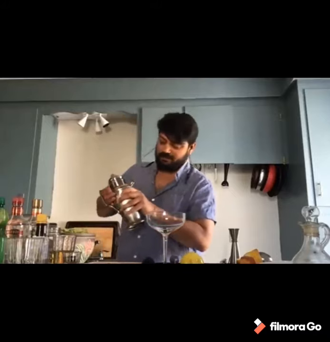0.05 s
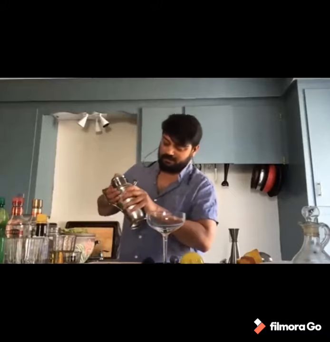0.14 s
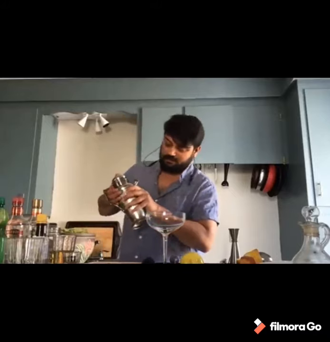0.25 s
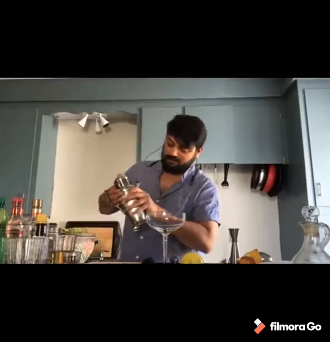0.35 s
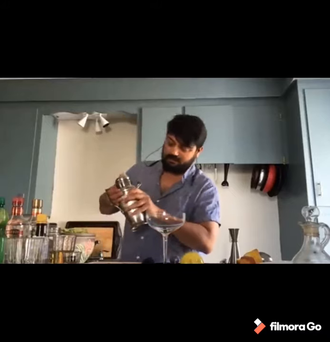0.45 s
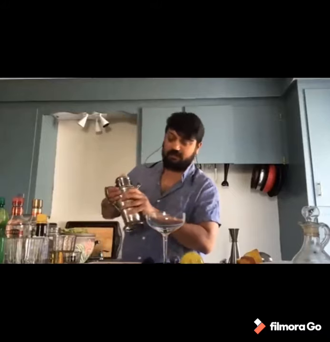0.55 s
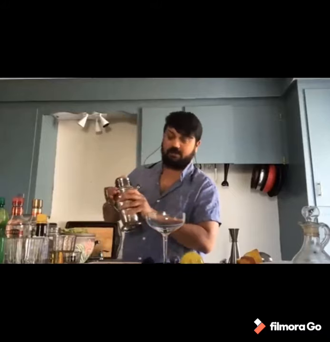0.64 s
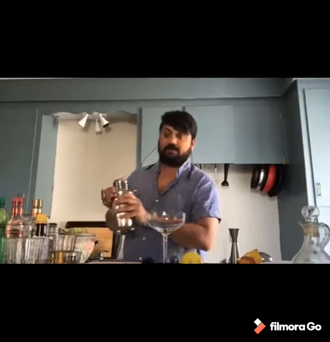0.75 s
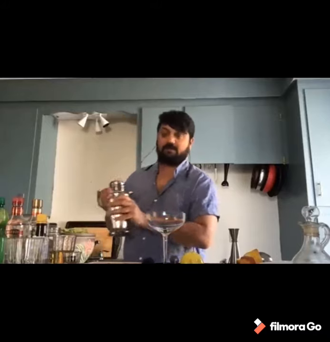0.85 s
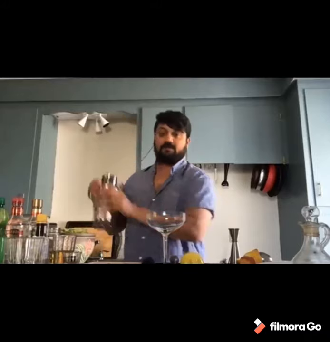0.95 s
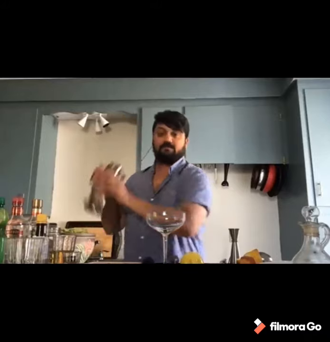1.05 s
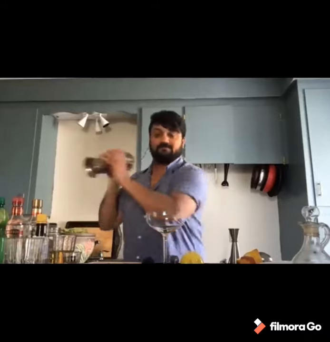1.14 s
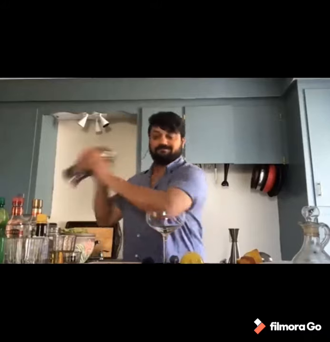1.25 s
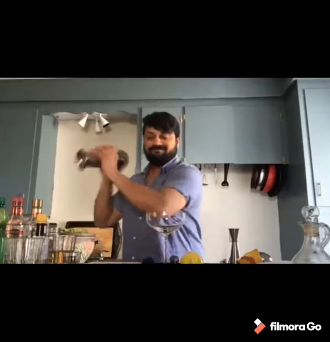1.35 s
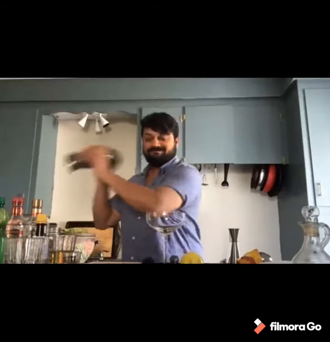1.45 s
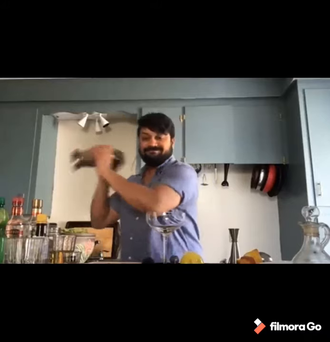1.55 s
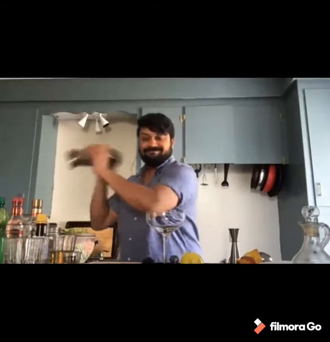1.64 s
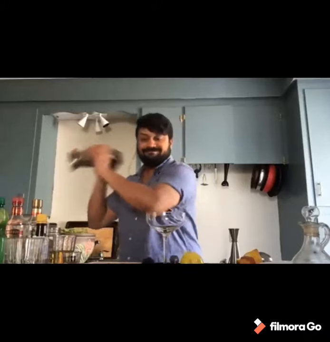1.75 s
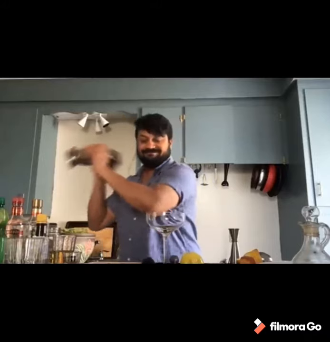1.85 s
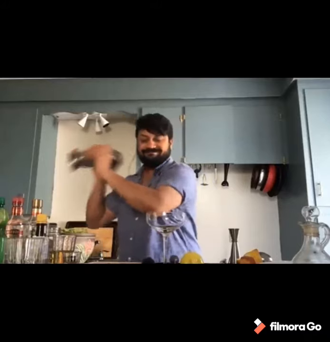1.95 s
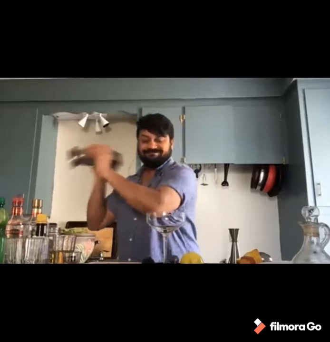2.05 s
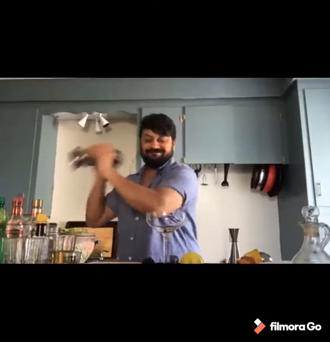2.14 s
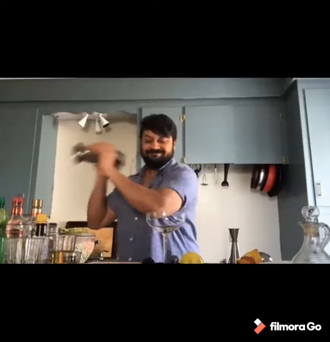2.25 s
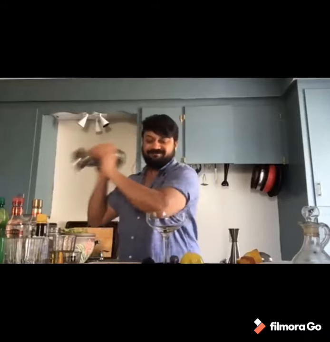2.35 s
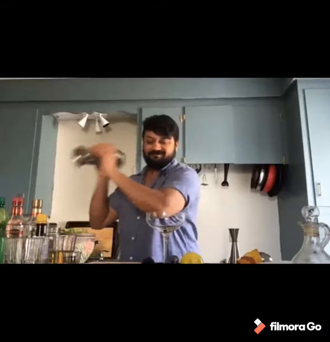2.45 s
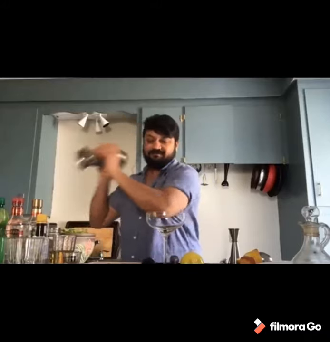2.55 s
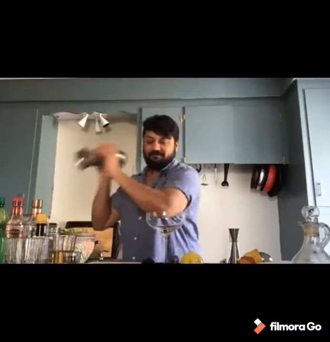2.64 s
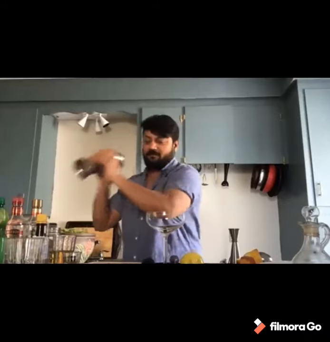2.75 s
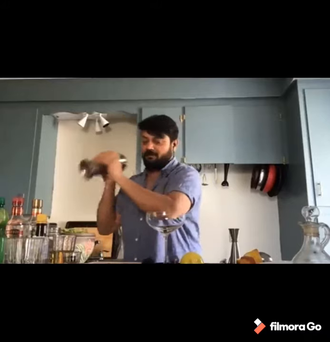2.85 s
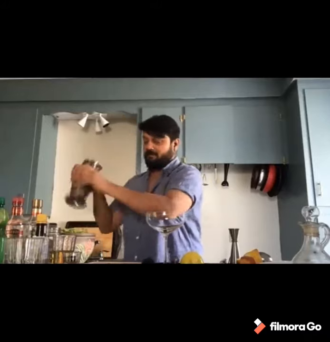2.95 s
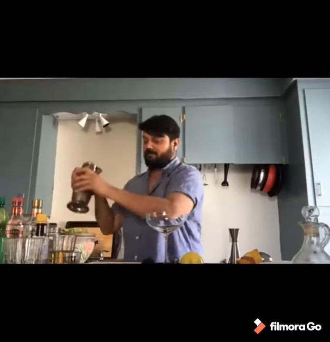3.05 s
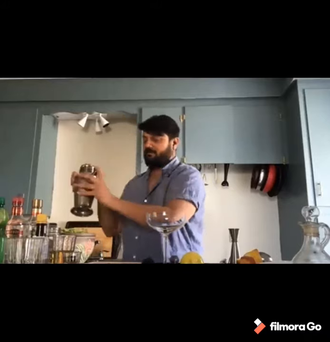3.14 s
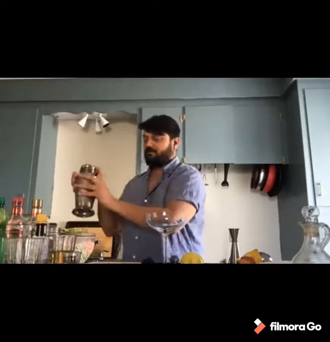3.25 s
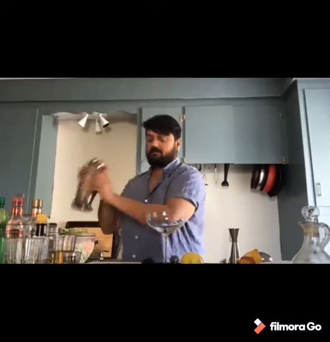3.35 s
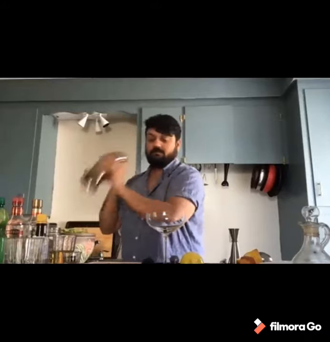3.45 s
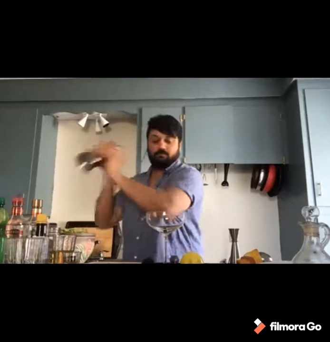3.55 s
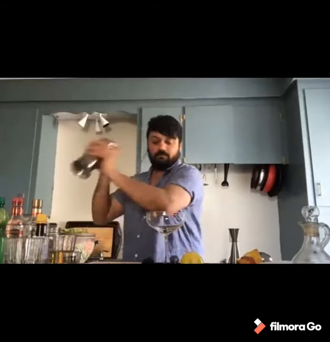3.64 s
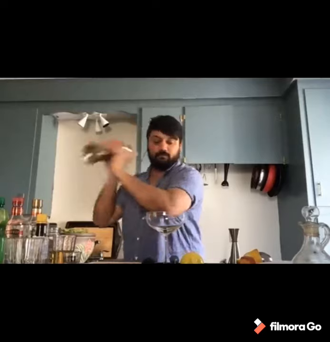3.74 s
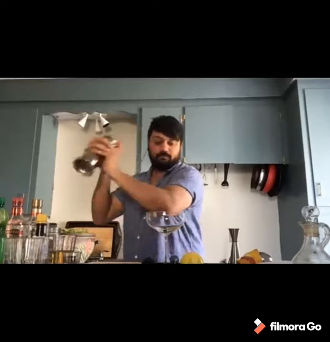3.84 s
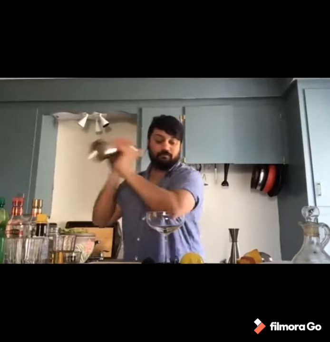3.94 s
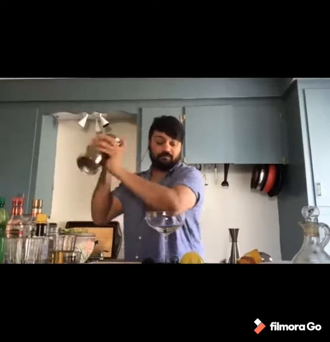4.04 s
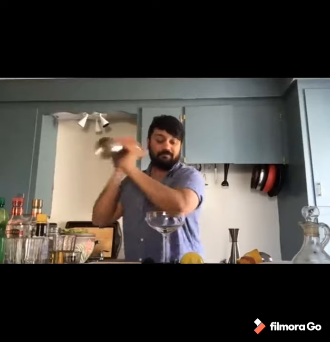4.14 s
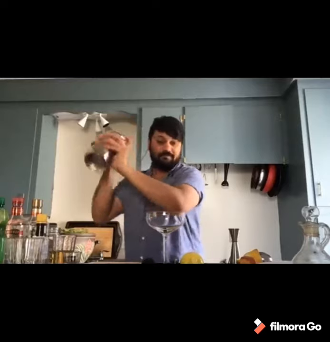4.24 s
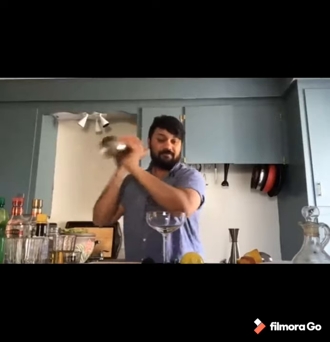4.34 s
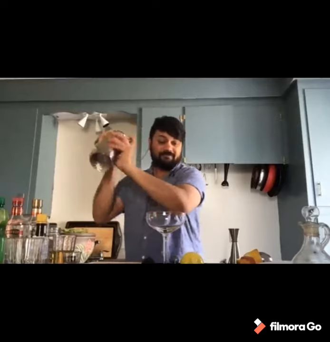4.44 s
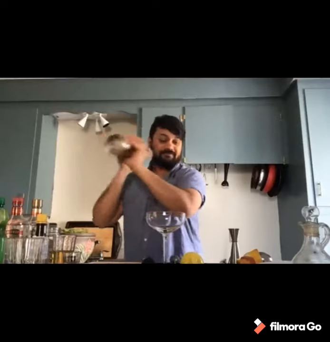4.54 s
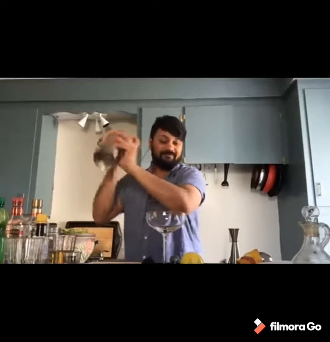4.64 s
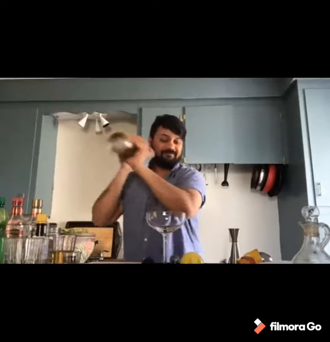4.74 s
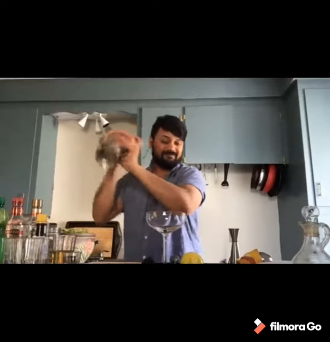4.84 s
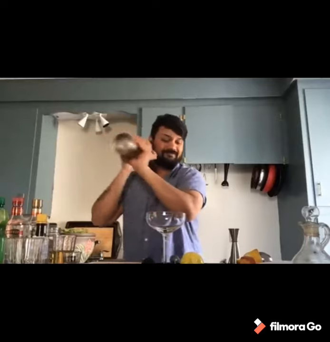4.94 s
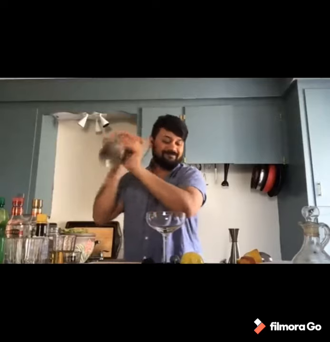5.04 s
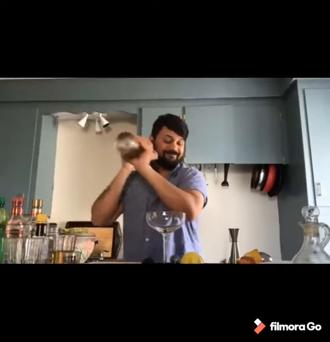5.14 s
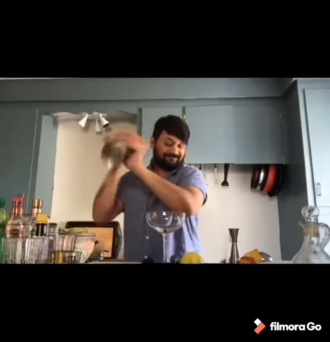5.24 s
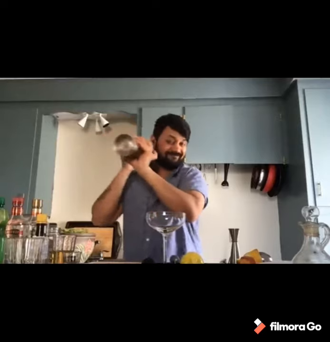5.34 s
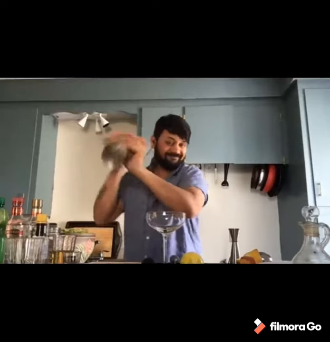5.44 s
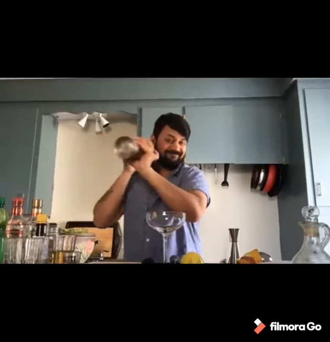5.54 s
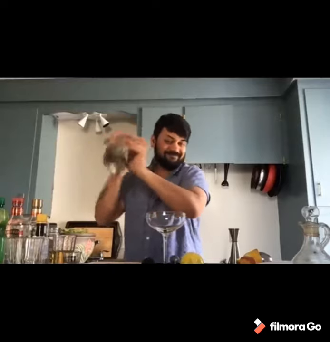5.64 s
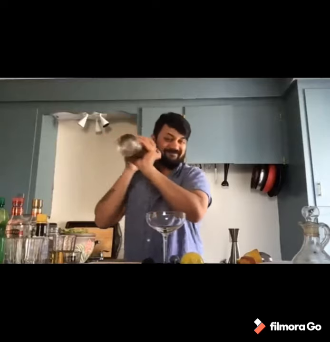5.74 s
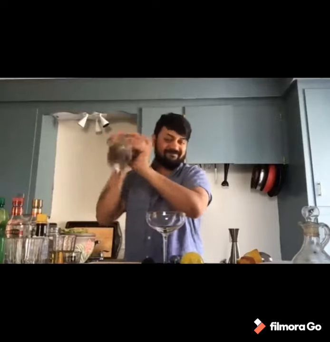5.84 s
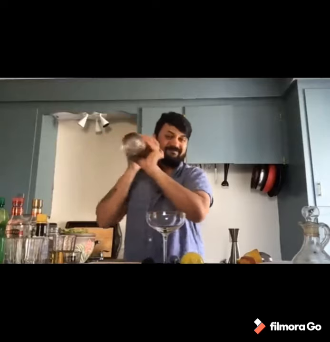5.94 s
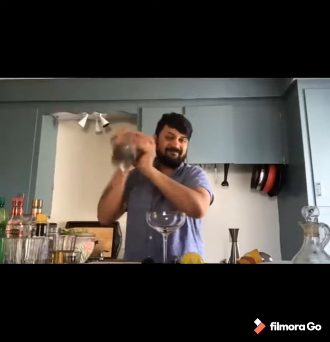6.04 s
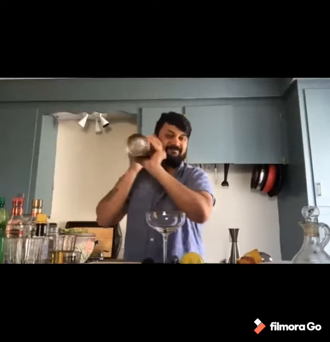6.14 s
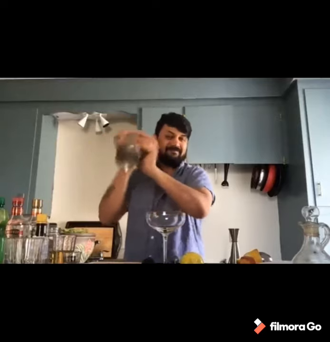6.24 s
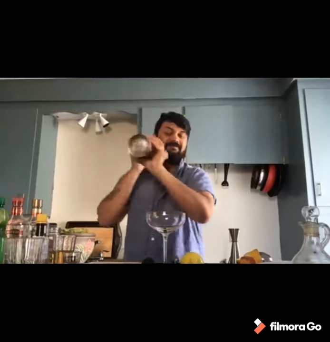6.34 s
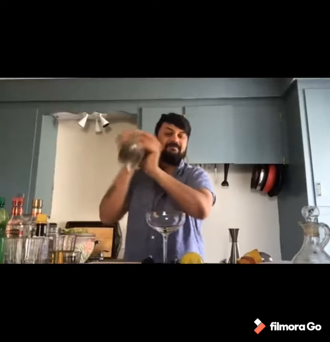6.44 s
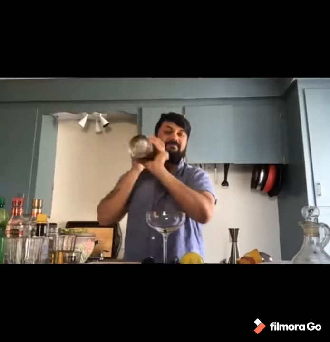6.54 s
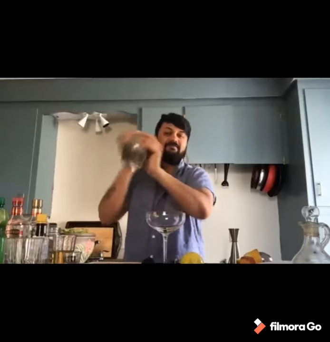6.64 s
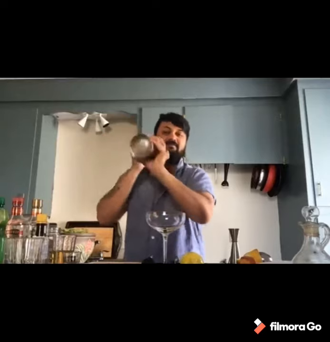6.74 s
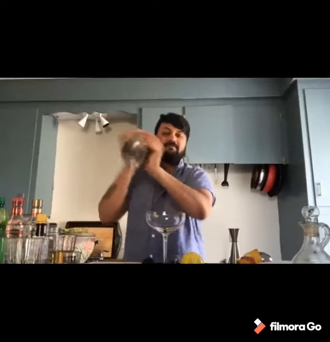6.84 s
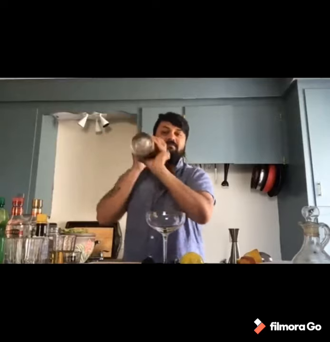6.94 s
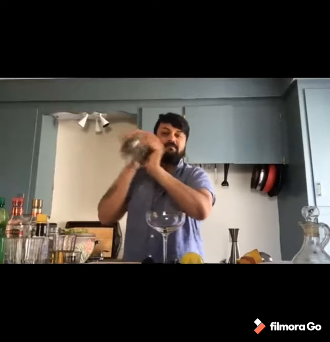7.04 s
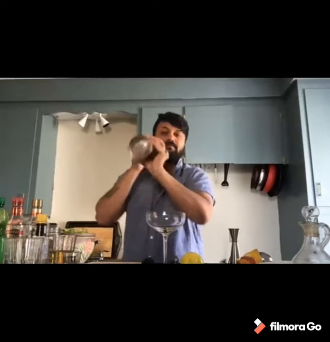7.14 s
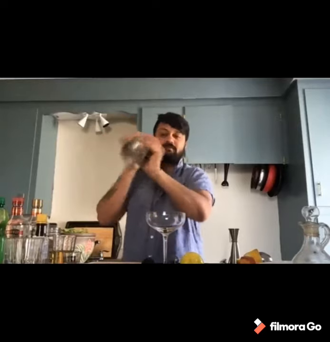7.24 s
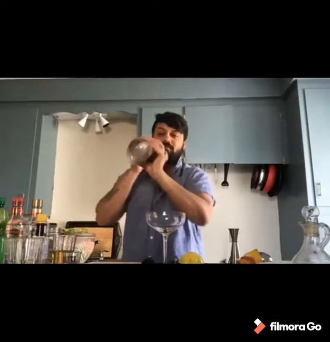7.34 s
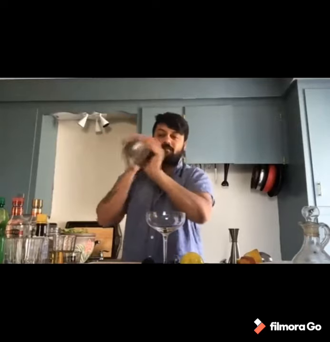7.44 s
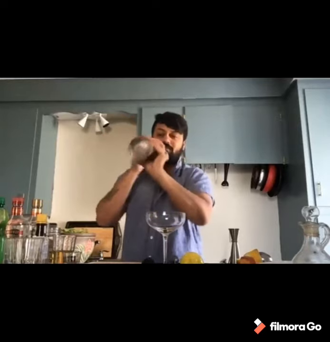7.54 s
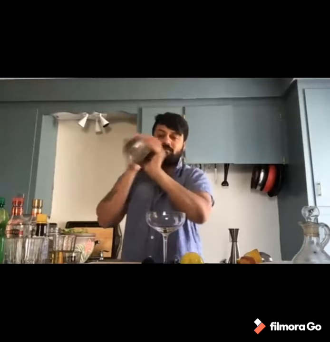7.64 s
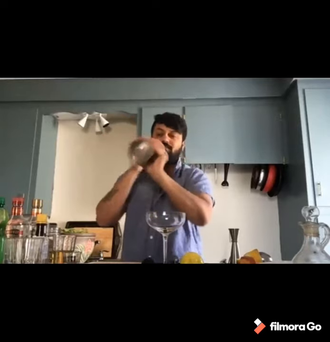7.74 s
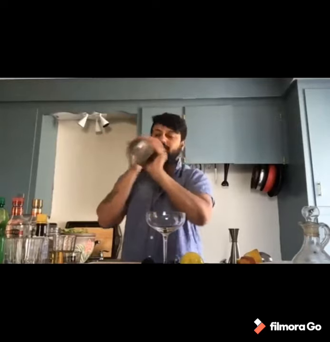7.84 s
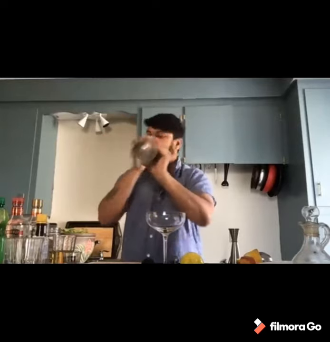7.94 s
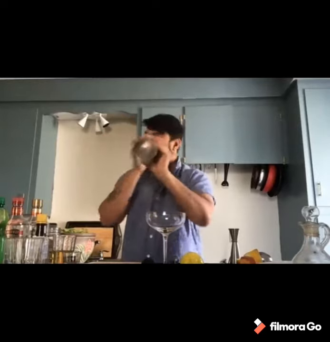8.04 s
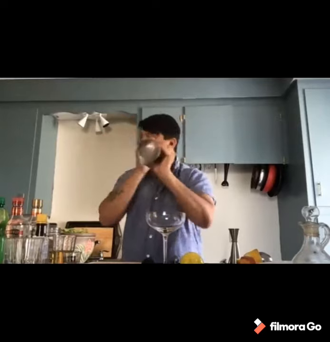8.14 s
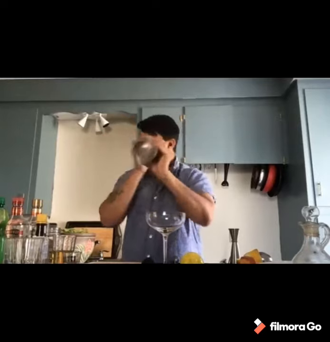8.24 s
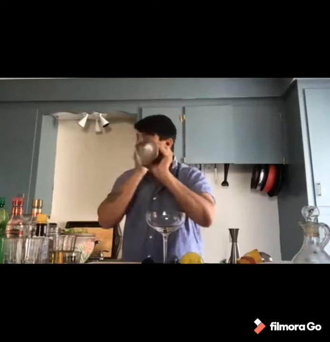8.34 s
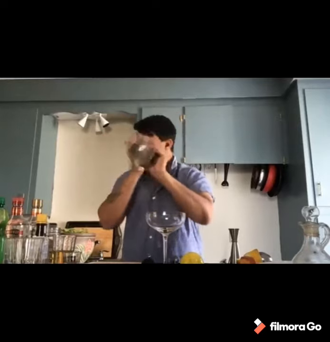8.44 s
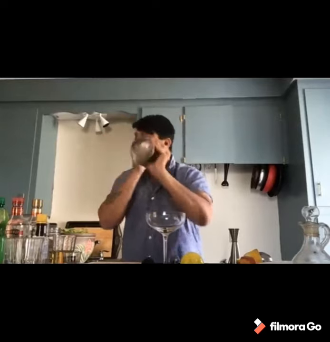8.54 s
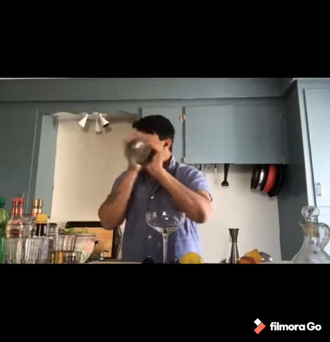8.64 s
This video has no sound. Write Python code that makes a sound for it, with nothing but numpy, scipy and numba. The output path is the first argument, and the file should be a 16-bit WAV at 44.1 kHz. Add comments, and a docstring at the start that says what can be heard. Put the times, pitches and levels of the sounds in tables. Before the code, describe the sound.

From 0 to 1.15 s there is near silence with faint wet clicks and tiny pings as ice shifts in a hand-held steel shaker. At about 1.2 s hard shaking bursts in: loud, short, damped metallic clacks, around twenty to thirty knocks and rebounds a second, centred in the middle pitches, with chips clattering and liquid sloshing between. It runs to 3.1 s, then nearly stops, with a small soft knock near 3.25 s and faint clicks. At 3.56 s a second equally dense bout begins, slightly lower in colour, with a momentary dropout near 4.64 s, ending about 5.9 s. Afterwards the rattle is clearly softer, rounder and sparser, with individual knocks and short pings of varied pitch, one stronger near 7.05 s, continuing to the end around 8.7 s. Short hard-kitchen echoes; midrange microphone, little bass or treble, tails clipped by noise suppression.

```python
"""Ice cubes are thrown to and fro in a hand-held steel shaker: a few handling knocks, two bouts of hard shaking
with a pause between, then a softer rattle. Hands and liquid damp the shell's modes, so each knock is a short
clack; noise washed through the same modes is the slosh, and swelling sines are the pings of single cubes.
The place is a hard kitchen with short diffuse echoes; a small microphone with a noise suppressor cuts the
quiet tails."""
import sys
import numpy as np
from scipy import signal
from scipy.fft import rfft, irfft
from scipy.io import wavfile
from scipy.ndimage import uniform_filter1d, minimum_filter1d
from numba import njit

SR = 44100
rng = np.random.default_rng(int(sys.argv[2]) if len(sys.argv) > 2 else 0)


def to_wav(s):
    """Save 16-bit WAV."""
    ch = np.atleast_2d(s).T  # columns
    pcm = np.round(np.clip(ch, -1, 1) * 32767)  # PCM
    wavfile.write(sys.argv[1], SR, pcm.astype(np.int16))


N = 384111


def from_db(db):
    """Decibels to gain."""
    return 10 ** (np.asarray(db) / 20)


def train(at, sizes):
    """Clicks of the given sizes at the given samples."""
    return np.bincount(np.clip(at, 0, N - 1), sizes, N)


def decay(x, t60):
    """Each click becomes a falling exponential."""
    return signal.lfilter([1], [1, -from_db(-60 / (t60 * SR))], x + 1e-18)


def swell(clicks, t60, rise_s):
    """Each click becomes a quick rise and an exponential fall."""
    return decay(clicks, t60) - decay(clicks, min(rise_s, t60 / 2))


def filtered(x, order, edge_hz, kind):
    """Butterworth filter."""
    return signal.sosfilt(signal.butter(order, edge_hz, kind, fs=SR, output="sos"), x)


@njit
def spin(clicks, turn):
    """A decaying rotor, turned by a new step every 64 samples."""
    out, z = np.empty(len(clicks)), 0j
    for i in range(len(clicks)):
        z = z * turn[i >> 6] + clicks[i]
        out[i] = z.imag
    return out


def ring(clicks, hz, t60):
    """A unit click sets a sine of height 1 ringing; hz holds its pitch every 64 samples."""
    return spin(clicks + 1e-18, from_db(-60 / (t60 * SR)) * np.exp(2j * np.pi * hz / SR))


KITCHEN_T60_S, KITCHEN_DB = 0.19, -11


def dying_noise(t60):
    """White noise that falls by 60 dB in t60, energy 1."""
    count = int(t60 * SR)
    tail = rng.standard_normal(SR)[:count] * from_db(-60 * np.arange(count) / count)
    return tail / np.sqrt(np.sum(tail ** 2))


def kitchen(x):
    """Diffuse echoes from cupboards and tiles, starting 4 ms after the direct sound."""
    echoes = np.r_[np.zeros(int(.004 * SR)), dying_noise(KITCHEN_T60_S)]
    return signal.fftconvolve(x, echoes)[:N]


# the bouts of hard shaking; all other times count as gentle: start_s, end_s
HARD_SHAKING = [(1.19, 3.1), (3.56, 5.9)]


def shaken_hard(s):
    """True inside the bouts of hard shaking."""
    return sum((s > a) & (s < b) for a, b in HARD_SHAKING) > 0


# grip and liquid bend the shell's modes: depth (share of pitch), changes per s
WANDER, WANDER_PER_S = 0.034, 23
STILL_SHARE = 0.3   # share of that depth before the shaking starts


def wander():
    """A pitch factor that strays at random as grip and liquid load the steel, one value every 64 samples."""
    s = np.arange(N // 64 + 1) * 64 / SR
    depth = WANDER * np.where(s < HARD_SHAKING[0][0], STILL_SHARE, 1)
    return 1 + depth * np.interp(s * WANDER_PER_S, np.arange(1000), rng.standard_normal(1000))


# steel shell's modes, before wander and the damping of each kind of contact: pitch_hz, level_db, t60_s
SHELL = [(262, 0, 0.039), (397, -6.5, 0.037), (480, 0, 0.032), (594, 1, 0.019), (752, 3.5, 0.018),
         (929, -9.5, 0.078), (1045, 2.5, 0.041), (1156, 1, 0.033), (1331, -2, 0.061), (1494, -4, 0.051),
         (1640, -2.5, 0.074), (1845, 2, 0.025), (2147, -4.5, 0.035), (2406, 7, 0.01), (2758, 1.5, 0.019),
         (2970, 4.5, 0.011), (3370, 7, 0.016), (3684, 7.5, 0.012), (4074, 5, 0.016), (4350, -4, 0.081),
         (5840, 2, 0.084)]
# the dry crack at first contact falls in one of these bands: low_hz, high_hz
CRACK_HZ = [(500, 2140), (800, 3600), (1500, 6000)]
TICK_DB, THUD_DB = 20, 16.5   # contact noise above and below the modes
MOST_CYCLES = 90   # no mode takes more cycles than this to fall by 60 dB


def shell(at, level_db, spot_hz, treble_db, bass_db, focus_db, scatter_db, contact_s, rise_s, clack_db, ring_share,
          treble_hz, crack_db):
    """A blow sets each mode ringing, most those near its spot; the ring swells over the contact, and the
    chatter of the contact adds a noisy clack around each mode; first contact is a dry crack."""
    chance = rng.standard_normal((len(at), len(SHELL), 2))
    chatter = rng.standard_normal((2, N)) / np.sqrt(contact_s * SR / 14)
    out = np.zeros(N)
    for k, (hz, mode_db, t60) in enumerate(SHELL):
        away = np.minimum(np.abs(np.log2(hz / spot_hz)) / 0.27, 1)   # 0 at the spot, 1 from 0.27 octave off
        treble_tilt_db = treble_db * np.clip(np.log2(hz / treble_hz) * 2, 0, 1)
        bass_tilt_db = bass_db * np.clip(np.log2(1000 / hz) * 2, 0, 1)
        off_spot_db = treble_tilt_db + bass_tilt_db - focus_db + scatter_db * chance[:, k, 0]
        strength = from_db(level_db + mode_db + away * off_spot_db)
        blows = train(at, strength * np.sign(chance[:, k, 1]))
        longest = min(t60 * ring_share, MOST_CYCLES / hz)       # wet hands damp the high modes first
        bent_hz = hz * wander()
        out += ring(blows, bent_hz, longest) - ring(blows, bent_hz, min(rise_s, longest / 2))
        clack = swell(train(at, strength), contact_s, rise_s) * chatter[k % 2]
        out += from_db(clack_db) * filtered(clack, 2, [hz / 1.07, hz * 1.07], "band")

    tick_size = from_db(level_db + 0.71 * treble_db + 2.3 * chance[:, 0, 1])
    tick = swell(train(at, tick_size), 2.34 * contact_s, 0.071 * rise_s) * chatter[0]
    thud = swell(train(at, from_db(level_db + bass_db)), contact_s, rise_s) * chatter[1]

    crack_level_db = level_db + crack_db + 0.4 * np.minimum(treble_db, 0) + 4.04 * chance[:, 1, 0]
    crack = from_db(crack_level_db) * np.sign(chance[:, 1, 1])
    colour = np.argmax(chance[:, :len(CRACK_HZ), 1], axis=1)   # each blow draws one band
    for k, edges_hz in enumerate(CRACK_HZ):
        out += filtered(train(at, crack * (colour == k)) + 1e-18, 2, edges_hz, "band")
    out += from_db(TICK_DB) * filtered(tick, 2, 5800, "high")
    return out + from_db(THUD_DB) * filtered(thud, 1, 150, "low")


# liquid against the stirring of the ice, in hard and gentle shaking (dB); surge time (s);
# how long it rings the shell (share of t60); where the wash's treble ends (Hz)
SLOSH_DB, SURGE_S, SLOSH_RING, SLOSH_TOP_HZ = (-40, -41), 0.022, 0.37, 4470
SLOSH_BASS_HZ, SPRAY_DB = 640, 18   # the wash has little below this; fine spray hisses on top
RUMBLE_DB, RUMBLE_HZ = (39, 34.5), 244   # the liquid's weight rumbles below the modes, in hard and gentle shaking
LUMP_DB, LUMPS_PER_S = 5, 14   # the rumble comes in lumps: spread and rate


def slosh(flow):
    """Liquid surges ahead of the ice, drains after it and washes softly through the shell's modes."""
    t = np.arange(N) / SR
    width = int(SURGE_S * SR)
    surge = uniform_filter1d(uniform_filter1d(flow, size=width), size=width)
    wash = surge * rng.standard_normal(N)
    lumps = from_db(LUMP_DB * np.interp(t * LUMPS_PER_S, np.arange(1000), rng.standard_normal(1000)))
    rumble = filtered(wash * lumps, 2, RUMBLE_HZ, "low")
    spray = filtered(wash, 4, 5000, "high")
    wash = filtered(wash, 2, [SLOSH_BASS_HZ, SLOSH_TOP_HZ], "band")
    rings = np.zeros(N)
    for k, (hz, db, t60) in enumerate(SHELL):
        rings += (-1) ** k * from_db(db) * ring(wash, hz * wander(), t60 * SLOSH_RING)
    return rings + from_db(SPRAY_DB) * spray + from_db(np.where(shaken_hard(t), *RUMBLE_DB)) * rumble


# loose chips tumbling after a knock (dB against it, in hard and in gentle shaking) and how often (per s)
TUMBLE_DB, TUMBLE_PER_S = (-14, -14), (450.0, 330)
TUMBLE_FOCUS_DB = (16, 21)   # how much a chip favours its own spot, in hard and in gentle shaking
SETTLE_DB_PER_S = (215, 201)   # how fast the chips settle, up to and after the end of the last hard bout


def tumble(rows, spread_db=6.0):
    """Chips clatter at random around the spot of the last knock, settling until stirred again; liquid sloshes along."""
    s, peak_db, spot_hz, treble_db, bass_db = rows[np.argsort(rows[:, 0])].T
    peak_db = np.minimum(peak_db, signal.medfilt(peak_db, kernel_size=7) + 4.0)   # a lone ping stirs no more ice
    t = np.arange(N) / SR
    hard = shaken_hard(t)
    at = np.flatnonzero(rng.random(N) < np.where(hard, *TUMBLE_PER_S) / SR)
    size, spot = rng.random((2, N))[:, at]
    last = np.maximum(np.searchsorted(s, t) - 1, 0)
    # a knock lifts the stirring only where it exceeds what is still settling
    settled_db = np.cumsum(np.where(t < HARD_SHAKING[-1][1], *SETTLE_DB_PER_S)) / SR
    stirred_db = np.maximum.accumulate(peak_db + settled_db[(s * SR).astype(int)])[last] - settled_db
    stirred_db[t < s[0]] = -200
    liquid = slosh(from_db(stirred_db + np.where(hard, *SLOSH_DB)))
    level_db = stirred_db[at] + np.where(hard[at], *TUMBLE_DB) - spread_db * np.log(size + 1 / 12)
    last = last[at]
    chip_hz = spot_hz[last] * 3.944 ** (2 * spot - 1)
    chips = shell(at, level_db, chip_hz, 0.54 * (treble_db[last] + 7.5), 0.79 * (bass_db[last] + 14.5),
                  focus_db=np.where(hard[at], *TUMBLE_FOCUS_DB), scatter_db=6.0, contact_s=0.007, rise_s=0.0032,
                  clack_db=14.0, ring_share=0.79, treble_hz=1980, crack_db=7.5)
    return liquid + chips


# cubes shifting softly while the shaker is handled; levels are nominal, treble and bass against the peak:
# start_s, level_db, spot_hz, treble_db, bass_db
HANDLING = [(0.099, -33.5, 2260, -45, -43), (0.113, -25.5, 1530, -9, -44), (0.156, -38.5, 1850, -6, -57),
            (0.214, -46, 1840, -26, -63), (0.26, -54, 2320, -25, -42), (0.386, -38.5, 1480, -29, -70),
            (0.413, -51, 1920, -21, -70), (0.504, -44, 1520, -48, -26), (0.562, -60, 2920, -11, -61),
            (0.631, -46.5, 1530, -4, -45), (0.657, -43, 1570, -38, -64), (0.688, -26.5, 1610, -8, -80),
            (0.719, -33.5, 1460, -16, -70), (0.822, -35, 1490, -11, -34.5), (0.871, -39, 1330, -6, -40),
            (0.888, -56, 423, -50, -15), (0.98, -53, 400, -51, 1), (1.001, -52, 297, -51, -1.5),
            (1.029, -38.5, 3250, 3, -23), (1.053, -28.5, 900, -5, -62.5), (1.102, -32, 1640, 5, -51),
            (1.148, -40.5, 2800, 6, -54.5), (3.357, -52.5, 536, -46.5, 2), (3.387, -57.5, 1630, 17, -18),
            (3.445, -53.5, 4000, -9, -28)]
HANDLED_TUMBLE_DB = -6   # ice stirs less after a handling contact


def handling():
    """Slow, wet contacts that last longer and ring on one spot."""
    s, peak_db, spot_hz, treble_db, bass_db = np.transpose(HANDLING)
    return shell((s * SR).astype(int), peak_db + 2.0, spot_hz, treble_db + 1.5, bass_db + 21.5, scatter_db=4.0,
                 focus_db=17.5, contact_s=0.11, rise_s=0.0048, clack_db=36.5, ring_share=0.84,
                 treble_hz=2770, crack_db=-8.0)


# short clear pings of single cubes and fittings, levels nominal: start_s, level_db, pitch_hz, length_s
PINGS = [(0.04, -60, 1530, 0.02), (0.112, -33, 1560, 0.0072), (0.113, -34.5, 750, 0.01),
         (0.388, -31.5, 1840, 0.0029), (0.51, -43, 760, 0.016), (0.51, -33.5, 1513, 0.017),
         (0.511, -39, 2330, 0.011), (0.56, -41, 2900, 0.0067), (0.641, -39, 1480, 0.013),
         (0.66, -36, 2260, 0.0055), (0.69, -26, 3140, 0.005), (0.775, -40.5, 1510, 0.0085),
         (0.824, -32.5, 2390, 0.0054), (0.826, -34, 924, 0.0078), (0.83, -36, 1490, 0.024),
         (0.877, -36, 1470, 0.023), (0.89, -24.5, 430, 0.0098), (0.976, -26, 374, 0.011),
         (0.992, -22, 235, 0.014), (1.027, -25.5, 3270, 0.0034), (1.048, -36.5, 988, 0.028),
         (1.105, -35.5, 980, 0.025), (1.106, -37, 1620, 0.008), (1.327, -5, 997, 0.02),
         (1.514, -15.5, 2226, 0.029), (1.684, -6.5, 1064, 0.013), (2.991, -20, 1880, 0.012),
         (3.25, -28.5, 1324, 0.028), (3.289, -41, 779, 0.024), (3.358, -34, 404, 0.021),
         (3.392, -50.5, 1640, 0.025), (3.478, -36.5, 1190, 0.0075), (3.567, -15, 1315, 0.029),
         (4.775, -14, 1820, 0.018), (5.939, -10.5, 3930, 0.0031), (6.001, -18, 4230, 0.0079),
         (6.062, -14, 3020, 0.0035), (6.327, -22.5, 925, 0.012), (6.395, -12.5, 1820, 0.0022),
         (6.456, -6, 1150, 0.005), (6.54, -26.5, 2556, 0.016), (6.573, -13.5, 575, 0.0048),
         (6.801, -21, 1055, 0.0044), (6.866, -21, 3150, 0.0043), (6.905, -11, 2970, 0.0031),
         (6.961, -21, 880, 0.0026), (7.008, -1.5, 6000, 0.0028), (7.051, -6, 1663, 0.0078),
         (7.087, -18, 3520, 0.0075), (7.274, -29, 1300, 0.023), (7.372, -19, 773, 0.0075),
         (7.369, -18.5, 2015, 0.0053), (7.413, -25, 2780, 0.0063), (7.594, -25, 545, 0.017),
         (7.688, -16.5, 3250, 0.0058), (7.782, -16, 680, 0.0043), (7.908, -16, 2114, 0.0079),
         (7.996, -15.5, 540, 0.0043), (8.157, -24, 4660, 0.0026), (8.184, -23.5, 650, 0.011),
         (8.287, -17, 3550, 0.0036), (8.395, -11, 4520, 0.0025), (8.511, -21.5, 1058, 0.0062),
         (8.584, -20, 425, 0.0055), (8.692, -23.5, 1890, 0.012), (8.683, -18.5, 4130, 0.0096)]


def pings():
    """Each ping is a steady sine that swells for a third of its length, then fades, cut off after four lengths."""
    out = np.zeros(N + SR)
    for (s, peak_db, hz, length), phase in zip(PINGS, rng.random(len(PINGS))):
        t = np.arange(int(4 * length * SR)) / SR
        u = 3 * t / length
        envelope = u * np.exp(1 - u)
        tone = np.sin(2 * np.pi * (hz * t + phase))
        out[int(s * SR):][:len(t)] += from_db(peak_db - 5.0) * envelope * tone
    return out[:N]


# cubes rebounding after a knock, levels nominal: start_s, level_db
REBOUNDS = [(1.686, -13), (1.752, -12.5), (1.785, -11), (1.882, -6.5), (1.937, -12.5), (1.962, -5),
            (1.979, -15.5), (2.071, -11.5), (2.077, -7), (2.173, -11), (2.264, -12), (2.273, -10.5),
            (2.298, -13.5), (2.336, -15.5), (2.381, -8.5), (2.468, -12), (2.479, -11.5), (2.493, -5.5),
            (2.507, -10), (2.539, -12), (2.612, -4.5), (2.639, -11.0), (2.8, -5.5), (3.654, -5.5),
            (3.71, -6), (3.784, -10.5), (3.826, -9), (3.86, 0), (3.87, -11), (3.899, -6.5), (3.997, -14.5),
            (4.106, -12.5), (4.319, -6.5), (4.324, -6.5), (4.433, -13), (4.503, -7.5), (4.512, -6),
            (4.538, -6), (4.553, -5.5), (4.72, -11), (4.763, -7.5), (4.855, -13), (4.964, -19),
            (5.05, -13.5), (5.109, -13.0), (5.169, -11.0), (5.198, -12.5), (5.245, -13.5), (5.338, -8),
            (5.343, -13.5), (5.356, -9), (5.379, -11), (5.389, -7), (5.457, -18.5), (5.501, -10),
            (5.556, -14.5), (5.652, -7.5), (5.663, -9), (5.726, -15.5), (5.75, -10.5), (5.842, -5.5),
            (5.982, -27.5), (6.075, -19), (6.091, -28), (6.141, -23.5), (6.177, -21.5), (6.251, -32.5),
            (6.286, -25), (6.412, -25.5), (6.996, -29), (7.099, -33), (7.73, -29), (7.824, -42),
            (8.292, -26), (8.301, -22.5), (8.307, -23), (8.496, -40.5)]


def rebounds(rows):
    """Each rebound strikes near the spot of the knock before it, with that knock's treble and bass."""
    rows, (s, peak_db) = rows[np.argsort(rows[:, 0])], np.transpose(REBOUNDS)
    before = rows[np.searchsorted(rows[:, 0], s) - 1]
    return np.c_[s, peak_db, before[:, 2] * 1.12 ** rng.standard_normal(len(s)), before[:, 3:]]


# cubes knocking the shell; levels are nominal, treble and bass against the peak, spot_hz the pitch the struck
# spot favours: start_s, level_db, spot_hz, treble_db, bass_db
KNOCKS = [(1.174, -29.5, 3600, -2, -25.5), (1.198, -16, 3230, 1, -36.5), (1.236, -9, 1700, -6, -24.5),
          (1.275, -14, 1820, -14.5, -24), (1.329, -3, 1065, -9, -33), (1.453, -5.5, 1070, -18.5, -24.5),
          (1.445, -5, 1530, -7.5, -23), (1.544, 1, 1820, -13.5, -31.5), (1.584, -6.5, 1500, -22, -39.5),
          (1.642, -2.5, 1320, -9, -17.5), (1.67, -2.5, 1670, -27, -18), (1.735, -1.5, 1470, -14, -20.5),
          (1.771, -8.5, 1580, -17, -24.5), (1.851, -19, 3630, -5, -15.5), (1.874, -10, 1010, -8.5, -14),
          (1.895, -4, 1366, -23, -39), (1.923, -7, 1610, -17.5, -28.5), (1.946, -3, 1200, -19.5, -22),
          (2.043, -8, 3380, -20, -11.5), (2.062, -8, 1650, -12.5, -20), (2.094, -6.5, 1640, -26, -26.5),
          (2.137, -9.5, 1040, -15, -13), (2.157, -4.5, 1580, -13, -23), (2.18, -2.5, 1550, -27.5, -17.5),
          (2.256, -5, 1760, -7, -14.5), (2.314, -3.5, 1540, -13, -40), (2.348, -9.5, 1640, -14.5, -26.5),
          (2.367, -5, 1570, -25, -18), (2.401, -12.5, 1630, -12, -54), (2.46, -5.5, 1576, -18, -21),
          (2.528, -5, 1656, -25.5, -30), (2.56, -6.5, 1190, -13, -16), (2.596, -4.5, 1860, -13.5, -25),
          (2.645, -4, 1240, -12.5, -22), (2.672, -6, 1400, -19.5, -23.5), (2.697, -6.5, 1620, -23, -25),
          (2.732, -7, 1620, -15.5, -19), (2.77, -4, 1390, -19.5, -15.5), (2.794, -6, 1060, -23.5, -28),
          (2.857, -8.5, 1370, -7.5, -15), (2.879, -13.5, 1440, -24, -13), (2.993, -12.5, 1820, -16.5, -35),
          (3.029, -10, 1065, -7, -17.5), (3.058, -8.5, 1540, -12.5, -19), (3.246, -23.5, 1220, -17.5, -4),
          (3.475, -35.5, 1196, -22.5, -50), (3.537, -28, 1390, -9.5, -26), (3.579, -9, 1330, -2, -18),
          (3.641, -6, 1130, -18, -23), (3.669, -7.5, 920, -29.5, -10.5), (3.691, -10, 1040, -9.5, -16),
          (3.774, -4.5, 1170, -18.5, -19.5), (3.806, -6.5, 1540, -25, -30.5),
          (3.852, -6.5, 1140, -15.5, -30.5), (3.888, -6, 1180, -19.5, -17),
          (3.91, -7.5, 1020, -29.5, -25.5), (3.972, -11.5, 1160, -2, -15), (3.988, -7, 1140, -15, -8),
          (4.022, -9, 1710, -21, -22.5), (4.069, -4, 950, -20.5, -20), (4.09, -9.5, 1100, -2, -13.5),
          (4.132, -3.5, 1050, -24, -22), (4.189, -6, 1050, -10.5, -10.5), (4.214, -7.5, 1150, -14.5, -31.5),
          (4.267, -7, 1430, -23.5, -22), (4.302, -5, 1145, -14.5, -17.5), (4.387, -4.5, 1025, -19.5, -25.5),
          (4.416, -6, 1520, -17, -23), (4.469, -2.5, 990, -16, -23), (4.498, -5, 1640, -20, -32),
          (4.528, -10, 1130, -16, -41), (4.588, -5, 1165, -14, -15), (4.666, -9, 1050, -22.5, -22),
          (4.704, -12.5, 1050, -22, -39.5), (4.726, -7, 1160, -16.5, -22), (4.751, -5.5, 1646, -24, -23),
          (4.777, -8, 1850, -16, -23.5), (4.845, -6.5, 1165, -16, -17.5), (4.91, -7.5, 1310, -23, -19.5),
          (4.952, -4.5, 1110, -14.5, -29), (5.031, -4.5, 1200, -17.5, -26),
          (5.059, -10.5, 1820, -18.5, -26), (5.09, -8, 1450, -20, -36.5), (5.152, -11, 1150, -11, -14),
          (5.189, -14.5, 1320, -10.5, -42.5), (5.238, -7, 1270, -18, -17), (5.26, -8.5, 1640, -16.5, -13.5),
          (5.325, -5, 955, -18, -25), (5.368, -7.5, 1130, -22, -20), (5.42, -14, 1630, -6, -25.5),
          (5.443, -9.5, 1090, -15.5, -10.5), (5.482, -9, 1640, -16, -51.5), (5.529, -8.5, 1800, -20, -30),
          (5.564, -6.5, 1760, -10.5, -21), (5.569, -9, 1090, -20, -26), (5.639, -6, 1640, -27.5, -18),
          (5.686, -9, 1660, -21.5, -32), (5.715, -10, 1540, -13.5, -21.5), (5.744, -8, 1440, -18, -19),
          (5.771, -10, 1720, -29.5, -15), (5.802, -14.5, 1860, -15, -24), (5.831, -10, 1680, -10, -21),
          (5.861, -15.5, 1040, -11.5, -31), (5.932, -15, 1600, -9, -16.5), (5.968, -15, 1490, -12, -38),
          (6.004, -19.5, 1050, 0.5, -32.5), (6.041, -15.5, 1300, -1, -23), (6.057, -18.5, 1040, -8.5, -21),
          (6.103, -15.5, 950, -23.5, -31.5), (6.149, -14.5, 1690, -8, -17),
          (6.259, -13.5, 1550, -10, -25.5), (6.278, -16.5, 1104, -21, -16), (6.322, -18, 940, -22, -23),
          (6.374, -20.5, 1730, -9, -10.5), (6.392, -20, 1880, -3, -38), (6.459, -15, 1460, -28.5, -30),
          (6.542, -21, 2580, -10, -13), (6.572, -21.5, 520, -7.5, -19), (6.661, -25.5, 3200, 1, -23),
          (6.688, -16.5, 1510, -1, -2), (6.739, -19.5, 1390, -21, -10.5), (6.776, -20.5, 3830, 4.5, -16),
          (6.799, -26, 1140, 3, -47), (6.855, -21, 3160, -5.5, -23), (6.904, -24.5, 3150, -12.5, -48),
          (6.957, -20, 935, -13, -25), (6.984, -27.5, 1044, 0, -21), (7.053, -10, 1340, -9.5, -58),
          (7.079, -19, 1730, -44, -21), (7.171, -22.5, 503, -7, -3), (7.21, -27, 1010, -2, -30),
          (7.243, -27.5, 1050, -0.5, -30), (7.274, -20, 1234, -12, -40), (7.29, -21, 1300, -11, -48),
          (7.369, -22.5, 770, -36, -9), (7.412, -26, 2140, -8, -36), (7.482, -20, 1070, -33, -66),
          (7.589, -21.5, 550, -18, -4), (7.671, -18, 1270, -10.5, -30.5), (7.687, -22, 3150, -25, -35),
          (7.784, -19, 720, -19, -9), (7.803, -23, 875, 3, -13), (7.886, -23.5, 1170, -9, -28),
          (7.906, -22.5, 2290, -1, -20), (7.985, -21, 566, 0, -18), (8.013, -27, 3400, 3, -24),
          (8.077, -25, 1750, -3, -52), (8.185, -22, 620, -4, -35), (8.262, -27.5, 1380, -13, -29),
          (8.282, -18, 1300, -9, -33), (8.365, -29.5, 3470, 0, -14), (8.399, -27, 5000, 1, -13.5),
          (8.503, -18.5, 2170, -3.5, -37), (8.582, -26.5, 500, 3, -19), (8.685, -15.5, 1870, -11, -34)]


def knocks(rows, hard):
    """Hard shaking and rebounds give short broad clacks; gentler knocks are rounder, each on its own pitch."""
    struck = rows[hard] + [0.0012, 0, 0, 0, 0]
    s, peak_db, spot_hz, treble_db, bass_db = np.r_[struck, rebounds(rows)].T
    clacks = shell((s * SR).astype(int), peak_db - 2.5, spot_hz, treble_db + 10.0, bass_db + 24.0, focus_db=11.5,
                   scatter_db=5.5, contact_s=0.014, rise_s=0.0012, clack_db=20.0, ring_share=0.48, treble_hz=1820,
                   crack_db=20.5)
    s, peak_db, spot_hz, treble_db, bass_db = rows[~hard].T
    clean_db = np.maximum(-37.0 - treble_db - bass_db, 0)      # a knock poor in treble and bass is one clear ping
    rounded = shell((s * SR).astype(int), peak_db + 2.0, spot_hz, treble_db + 3.5, bass_db + 20.0, scatter_db=6.0,
                    focus_db=17.5 + 0.74 * clean_db, contact_s=0.026, rise_s=0.025, clack_db=13.0,
                    ring_share=0.68, treble_hz=1940, crack_db=6.5)
    return clacks, rounded


# the level dips briefly; the first and last values hold before and after: time_s, level_db
DIP = [(4.594, -2), (4.627, -20.5), (4.646, -42), (4.656, 1)]


def scene():
    """The shaker and its echoes; the round knocks and pings raise less echo."""
    rows = np.array(KNOCKS)
    clacks, rounded = knocks(rows, shaken_hard(rows[:, 0]))
    rounded = rounded + pings()
    handled = HANDLING + np.array([0, HANDLED_TUMBLE_DB, 0, 0, 0])
    rattle = clacks + handling() + tumble(np.r_[rows, handled])
    heard = rattle + rounded + from_db(KITCHEN_DB) * kitchen(rattle + from_db(-0.5) * rounded)
    return (heard * from_db(np.interp(np.arange(N) / SR, *np.transpose(DIP))))[None]


SUPPRESS_BELOW_DB = -90.5   # fixed threshold in each band


def suppressor(x, steady_db=-33.5, size=512):
    """Bands that fall under a fixed threshold, or far under their level of the last half second, are turned down."""
    bins = signal.stft(x, nperseg=size, noverlap=size * 3 // 4)[2]
    power = np.abs(bins) ** 2
    power = np.maximum(uniform_filter1d(uniform_filter1d(power, size=7, axis=0), size=3, axis=1), 0)
    steady = signal.lfilter([.006], [1, -.994], power, axis=1)
    above = power / (from_db(2 * SUPPRESS_BELOW_DB) + from_db(steady_db) ** 2 * steady)
    gain = above ** 1.526 / (1 + above ** 1.4898)   # strong bands rise slightly
    return signal.istft(bins * gain, nperseg=size, noverlap=size * 3 // 4)[1][:N]


def causal_colour(points, size=4096):
    """Minimum-phase impulse response of a (Hz, dB) curve, by folding its cepstrum."""
    hz, level_db = np.transpose(points)
    grid = np.log(np.maximum(np.fft.rfftfreq(size, 1 / SR), 1))
    cepstrum = irfft(np.log(from_db(np.interp(grid, np.log(hz), level_db))))
    cepstrum[1:size // 2] *= 2
    cepstrum[size // 2 + 1:] = 0
    return irfft(np.exp(rfft(cepstrum)))


LIMIT = .62   # full scale is 1


def limiter(x, size=89):
    """Gain falls just ahead of any peak over the top and recovers within milliseconds."""
    gain = np.minimum(1, LIMIT / (np.abs(x) + 1e-9))
    return x * uniform_filter1d(minimum_filter1d(gain, size=size), size=size)


# response of the microphone and its case: pitch_hz, level_db
MICROPHONE = [(30, -47.5), (212, -32), (480, -11.5), (835, -8), (1030, -7), (1660, -4.5), (2160, -5.5),
              (3660, -8.5), (5300, -24), (7280, -49), (10500, -54), (12300, -70), (15200, -39),
              (16500, -70)]
SELF_NOISE_DB, CUTOFF_HZ = -100, 15900


def record(dry):
    """Suppressor, microphone colour, limiter, faint self-noise, cut top."""
    sound = signal.fftconvolve(suppressor(dry[0]), causal_colour(MICROPHONE))[:N]
    sound = limiter(sound) + from_db(SELF_NOISE_DB) * rng.standard_normal(N)
    return signal.sosfilt(signal.cheby2(12, 60, CUTOFF_HZ, fs=SR, output="sos"), sound)[None]


dry = scene()
out = record(dry)
to_wav(out)
```